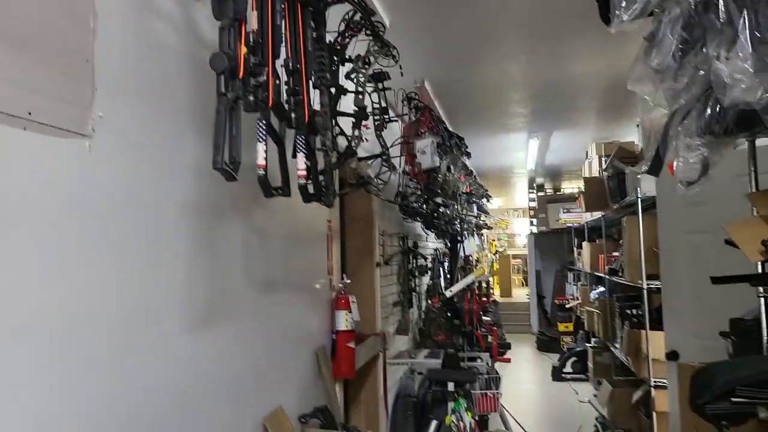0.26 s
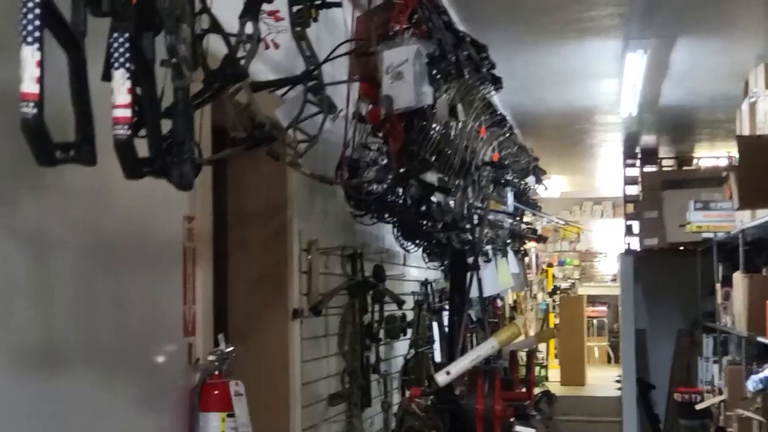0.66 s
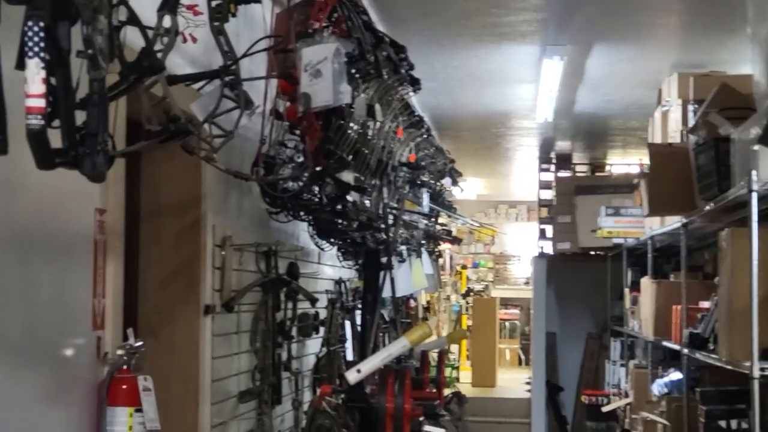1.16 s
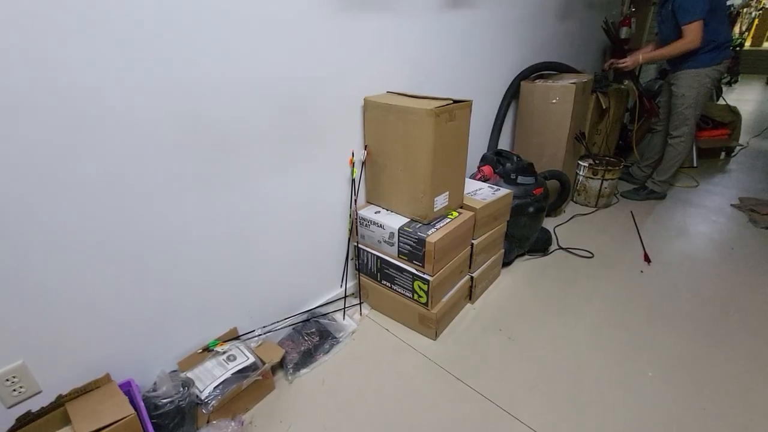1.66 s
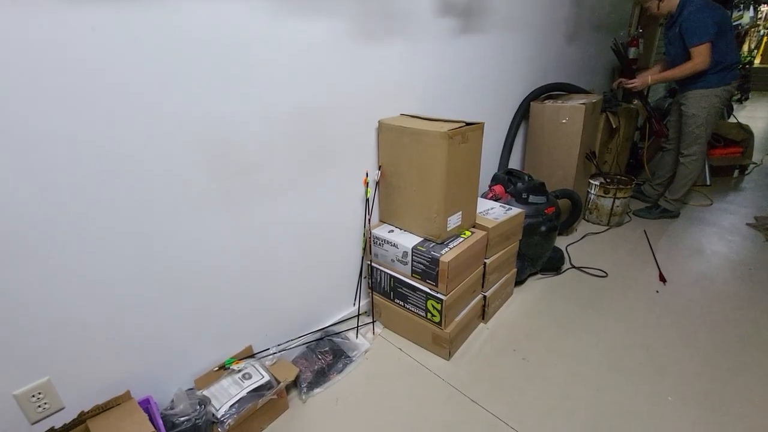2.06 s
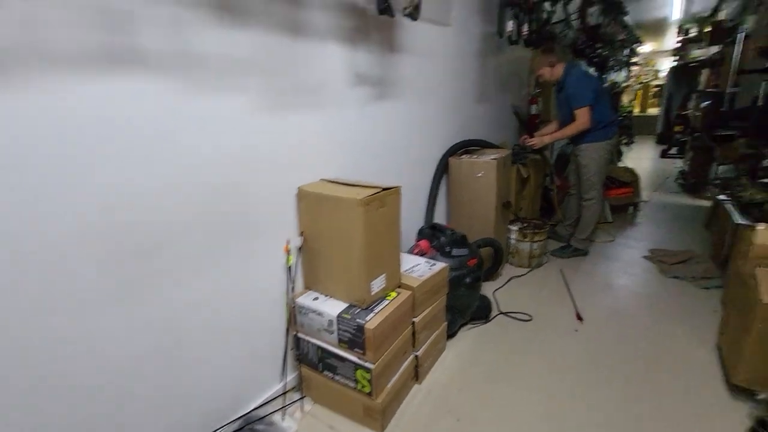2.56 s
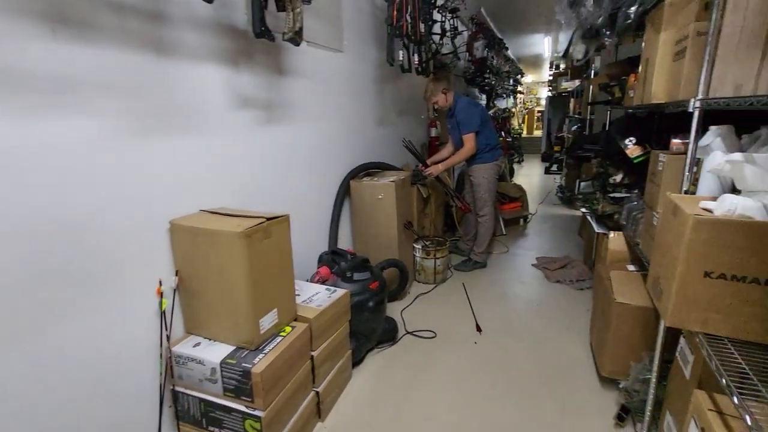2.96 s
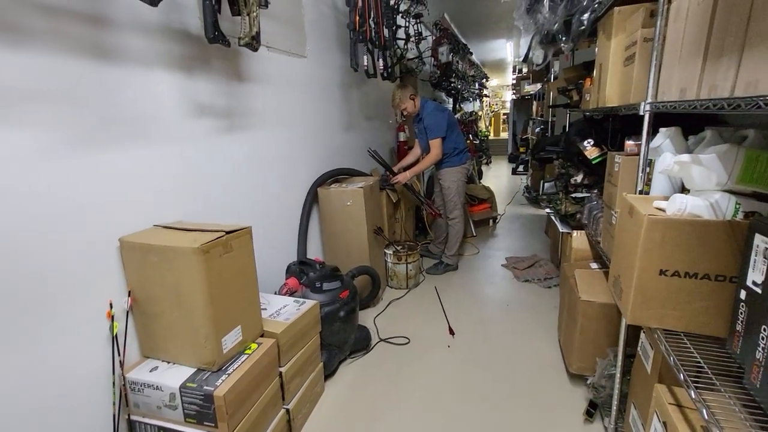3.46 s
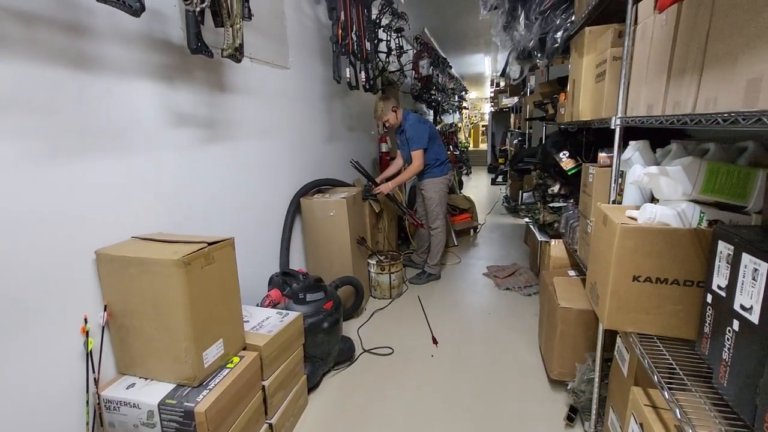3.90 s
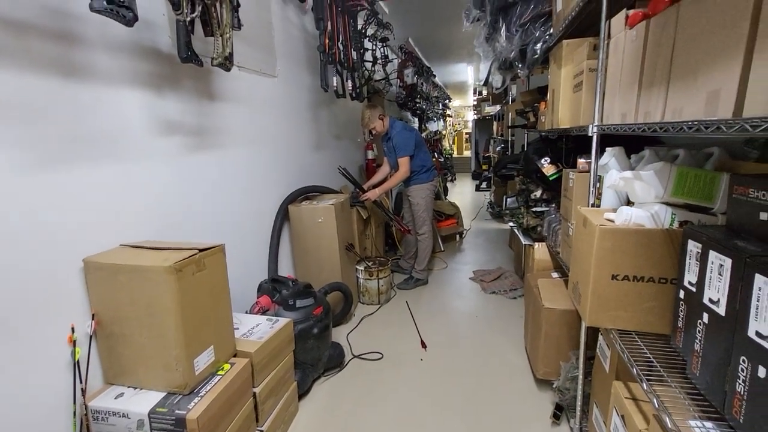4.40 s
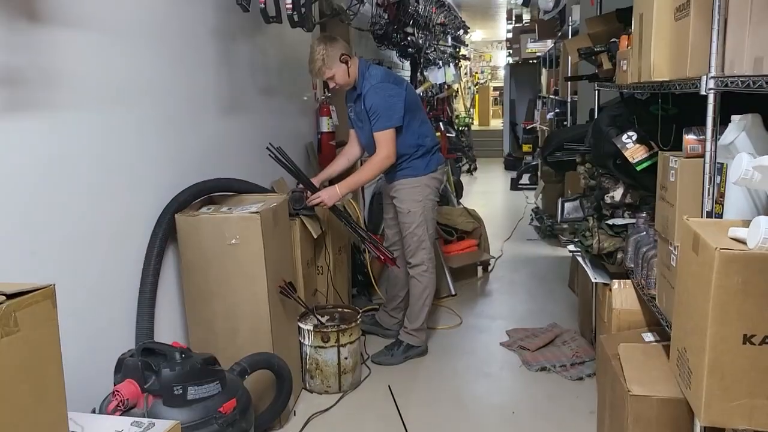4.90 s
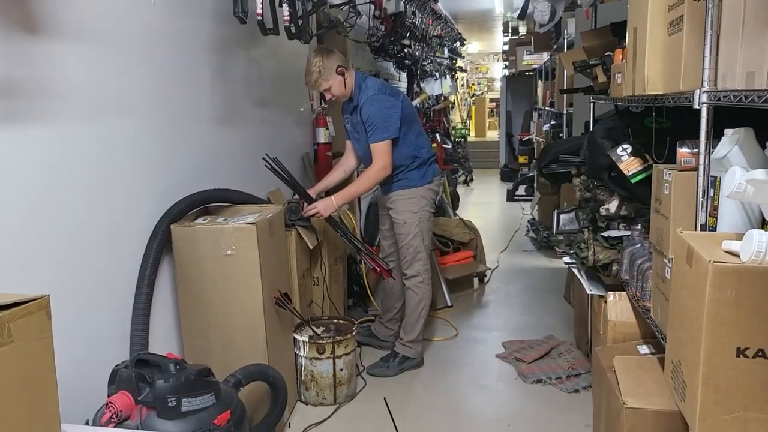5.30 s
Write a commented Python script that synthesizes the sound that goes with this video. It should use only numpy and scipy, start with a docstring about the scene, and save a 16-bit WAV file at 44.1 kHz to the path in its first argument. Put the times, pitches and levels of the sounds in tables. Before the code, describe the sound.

A quiet storeroom with faint low rumble, then a shop vacuum cuts in abruptly at full speed, rushing and humming steadily to the end.

```python
"""A shop vacuum at full speed, a few steps away, cuts in at once after a quiet storeroom.
Air, as noise shaped by resonances, rushes through its housing over sines: shaft hum and nine-blade whine.
A slower tone, likely a worn bearing's cage, drifts beside the hum; its harmonics, faint at first,
break into a thin squeal as the microphone is carried closer. The room before is rumble and soft noise."""
import sys
import numpy as np
from scipy import signal
from scipy.fft import rfft, irfft
from scipy.io import wavfile
from scipy.ndimage import uniform_filter1d

SR = 44100
rng = np.random.default_rng(int(sys.argv[2]) if len(sys.argv) > 2 else 0)


def output_pcm(signal):
    """Save a mono or channel-first signal as 16-bit PCM at the path in sys.argv[1].

    Samples are clipped to [-1, 1] before scaling.
    """
    pcm = np.clip(np.atleast_2d(signal).T, -1, 1) * 32767
    wavfile.write(sys.argv[1], SR, np.round(pcm).astype(np.int16))


N = 244402
TIME = np.arange(N) / SR
FFT_SIZE, HOP = 2048, 512
BINS = np.fft.rfftfreq(FFT_SIZE, 1 / SR)
FRAMES = np.arange(N // HOP + 5) * HOP / SR

HUSH_S, START_S = 1.579, 1.598  # the room stops; the vacuum enters
EMERGE_S, IN_VIEW_S, ARRIVE_S = 2, 2.7, 4.9  # from behind boxes, into open view, reached


def gain_of(db):
    """Decibels to amplitude."""
    return 10 ** (np.asarray(db) / 20)


def evened(x):
    """Scale to rms 1."""
    return x / np.sqrt(np.mean(x ** 2) + 1e-20)


def follow(rows, at=TIME):
    """Each column of a table, joined by straight lines."""
    first, *columns = np.transpose(rows)
    return [np.interp(at, first, column) for column in columns]


def read(rows):
    """Each column of a spectrum, joined on a log-frequency axis."""
    hz, *columns = np.transpose(rows)
    return [np.interp(np.log(BINS + 1), np.log(hz + 1), column) for column in columns]


def bell(x, centre, width):
    """Hump of height 1, half as high at half its width from the centre."""
    return 0.5 ** ((2 * (x - centre) / width) ** 2)


def ramp(at, start_s, end_s):
    """Even rise from 0 to 1 between two moments."""
    return np.clip((at - start_s) / (end_s - start_s), 0, 1)


def wander(rate_hz):
    """Smooth random signal of rms 1: noise under a Gaussian low-pass."""
    hz = np.fft.rfftfreq(N, 1 / SR)
    low_pass = np.exp(-(hz / rate_hz) ** 2) * (hz > 0)
    return evened(irfft(rfft(rng.standard_normal(N)) * low_pass, N))


def band(x, low_hz, high_hz):
    """The part of x between two frequencies."""
    hz = np.fft.rfftfreq(N, 1 / SR)
    return irfft(rfft(x) * ((hz >= low_hz) & (hz < high_hz)), N)


def noise_pair(field_db, same, phase=0, balance_db=0):
    """Noise at two microphones, shaped over time and frequency, partly alike in both."""
    a, b, c, d = rng.standard_normal((4, len(FRAMES), len(BINS)))
    same = np.clip(same, -1, 1)
    left = a + 1j * b
    right = same * np.exp(1j * phase) * left + np.sqrt(1 - same ** 2) * (c + 1j * d)
    tilt = gain_of(balance_db / 2)
    spectra = np.array([left * tilt, right / tilt]) * gain_of(field_db)
    _, pair = signal.istft(spectra, nperseg=FFT_SIZE, noverlap=FFT_SIZE - HOP, time_axis=1, freq_axis=2)
    return pair[:, :N]


def tone(turns, level_db, apart=0):
    """Sine at both ears at an rms level, the right ear behind by a phase in radians."""
    angle = 2 * np.pi * turns
    return np.sqrt(2) * gain_of(level_db) * np.sin([angle, angle - apart])


def walk(at=TIME):
    """How far the vacuum is in open view, and how much of the approach is done, both 0-1."""
    return ramp(at, EMERGE_S, IN_VIEW_S), ramp(at, START_S, ARRIVE_S)


def along_walk(ears):
    """Level of a motor tone at each ear as the microphone rounds the boxes and draws near."""
    view, near = walk()
    return np.array([db + view * view_db + near * near_db for db, view_db, near_db in ears])


def still_room(lumpy_db=0.5):
    """Uneven low rumble under a faint wash of air; both rise a little as the microphone moves."""
    # Each row: frequency in Hz, relative density in dB per Hz.
    room_spectrum = [(12, -42), (20, -8.5), (80, 8.5), (103, -10.5), (185, -17.5), (315, -17.5),
                     (352, -20.5), (439, -24), (549, -23.5), (985, -27), (2470, -27), (3000, -33.5),
                     (6360, -39), (8400, -61), (15500, -57)]
    # Each row: frequency in Hz, left-right likeness from -1 to 1.
    room_same = [(60, 0.88), (130, 0.93), (290, 0.88), (640, 0.46), (1410, 0.0049), (3100, -0.17),
                 (6820, 0.035), (15000, 0.02)]
    split_hz, rumble_db, air_db = 130, -52, -59  # levels of the ear average, before the rise
    noise = noise_pair(read(room_spectrum)[0], read(room_same)[0])
    low, high = band(noise, 0, split_hz), band(noise, split_hz, SR)
    rumble = low / np.std(low.mean(0)) * gain_of(rumble_db + lumpy_db * wander(8.3))
    air = high / np.std(high.mean(0)) * gain_of(air_db)
    rise_db = 3 * ramp(TIME, 0.22, 0.46)
    return (rumble + air) * gain_of(rise_db)


def standing_waves():
    """Fine peaks and dips of the room's response in dB, different at each ear, shifting over time."""
    ripple = rng.standard_normal((2, len(FRAMES), len(BINS)))
    ripple = uniform_filter1d(ripple, size=130, axis=1)
    ripple = evened(uniform_filter1d(ripple, size=2, axis=2))
    return 2.8 * ripple / np.sqrt(1 + (BINS / 9000) ** 2)  # the room soaks up the top treble


def rush(jet_from_hz=6500, jet_span_hz=8500, flutter_db=0.67):
    """Turbulent air coloured by resonances; the jet's treble grows on approach and eases at the end."""
    # Rushing air. Each row: frequency in Hz, relative density in dB per Hz.
    rush_spectrum = [(30, -70.5), (100, -62), (180, -58.5), (350, -54.5), (550, -53), (1000, -65.5),
                     (2700, -56), (4500, -58), (6300, -53), (7800, -66), (8350, -79), (9300, -68.5),
                     (12500, -62), (15500, -60)]
    # Low resonances of drum and hose, then those of housing and room.
    # Each row: centre in Hz, width in Hz, boost in dB behind the boxes, boost in dB in open view.
    drum = [(196.5, 36, 6.5, 4.5), (217.6, 22, -3, -7.5), (288, 23, -9, 4.5), (330, 30, 10.5, -1.5),
            (476, 83, 5, 3), (510, 42, -3, -4.5)]
    resonances = [(611, 45, 10.5, 1.5), (679, 110, 10, 13.5), (782.6, 59, 13, 14), (873, 65, 3, 7),
                  (1016, 250, 14.5, 12), (1290, 284, 13, 13.5), (1610, 217, 14, 9), (1826, 212, 13, 12.5),
                  (1972, 24, -6, 16), (2110, 62, 6.5, 9.5), (2270, 144, 4.5, 7.5), (2510, 200, 3, 5),
                  (3098, 163, 4.5, 8), (3493, 230, 5, 5), (3904, 480, 4, 6.5), (4316, 220, 5, 6.5),
                  (4670, 500, 5, 5.5), (6100, 160, 0.2, 3.5)]
    # Exhaust jet's top treble. Each row: time in seconds, boost in dB.
    jet = [(1.6, -3.5), (2.7, 0.5), (4.3, 3), (5.54, 1.5)]
    # Rush at the two ears. Each row: frequency in Hz, likeness 0-1, phase in radians,
    # left minus right in dB.
    ear_pair = [(60, .97, 0, 1), (330, .95, -.05, .5), (490, .7, -.2, 1.5), (570, .25, -1.4, 0),
                (720, .25, -3, 0), (1050, .7, -3.4, 2), (1290, .22, -3.6, 2), (1750, .7, -3, -2),
                (2130, .2, -3, -3), (2370, .35, -4.7, -2), (2740, .35, -2.6, -2.3), (3560, .34, -3, -1),
                (4340, .5, -4.6, -1.5), (4700, .22, -2.8, -1), (6150, .12, -3, -1.5), (15000, .1, -3, -1.2)]
    rush_db = -21  # 500-3900 Hz band of the ear average
    lag_s, wall_lag_s, lag_from_hz = 0.0009, 0.00127, 1700

    view = walk(FRAMES)[0][:, None]
    jet_db = follow(jet, FRAMES)[0][:, None]
    field_db = read(rush_spectrum)[0] + jet_db * np.clip((BINS - jet_from_hz) / jet_span_hz, 0, 1)
    for hz, width_hz, hidden_db, open_db in [*drum, *resonances]:
        field_db = field_db + (hidden_db + view * (open_db - hidden_db)) * bell(BINS, hz, width_hz)

    same, phase, balance_db = read(ear_pair)
    treble_hz = np.maximum(BINS - lag_from_hz, 0)
    # treble reaches the right side later; from behind the boxes it comes by way of the wall
    direct = np.exp(1j * (phase - 2 * np.pi * lag_s * treble_hz))
    by_wall = np.where(treble_hz > 0, np.exp(-2j * np.pi * wall_lag_s * treble_hz), direct)
    link = np.clip(same, 0, 1) * (view * direct + (1 - view) * by_wall)
    ripple_db = np.sqrt(np.maximum(1 - abs(link) ** 2, 0)) * standing_waves()
    air = noise_pair(field_db + ripple_db, abs(link), np.angle(link), balance_db)
    air = air / np.std(band(air.mean(0), 500, 3900))
    return air * gain_of(rush_db + flutter_db * wander(22))


def motor(jitter=0.00042):
    """Unbalanced shaft hums once a turn, blades whine at a multiple, iron hums at twice the mains rate."""
    # Shaft hum, left ear then right. Each row: level in dB behind the boxes,
    # dB added in open view, dB added on arrival.
    hum = [(-18, 1.4, -3), (-19, -1.5, -5.5)]
    # Each row: multiple of the shaft rate, level in dB, radians between the ears.
    overtones = [(2, -34.5, 2.16), (3, -33, 1.24), (14, -41, 1.0), (18, -49, 1.9)]
    shaft_hz, mains_hz, mains_db = 441.5, 60, -50.5
    turns = np.cumsum(shaft_hz * (1 + jitter * wander(4.25))) / SR
    out = tone(turns, along_walk(hum), apart=0.56)
    out += tone(2 * mains_hz * TIME, mains_db)
    for order, db, apart in overtones:
        out += tone(order * turns, db, apart)
    return out + whine(turns)


def whine(turns, fade_db=3.0, drift=0.6):
    """Blade-passing tone, flickering in the room's standing waves and swelling at each strong one."""
    # Left ear then right. Each row: level in dB behind the boxes, dB added in open view,
    # dB added on arrival.
    whine_levels = [(-27, -2.5, -6), (-29, 2, 0)]
    # Each row: peak in seconds, length in seconds, left level in dB, right level in dB,
    # radians between the ears.
    swells = [(1.7, .38, -19, -21.5, 3), (2.1, 0.27, -22.5, -32, 1.6), (2.679, 0.14, -23, -24, 4),
              (2.963, 0.19, -31, -19.5, 0), (3.532, 0.33, -24.5, -24.5, 2.3), (5.2, 0.86, -32, -26, -1.5)]
    blades, apart_rad = 9, 2.2
    passes = blades * turns
    fading_db = fade_db * np.array([wander(4), wander(3.6)])
    out = tone(passes, along_walk(whine_levels) + fading_db, apart_rad + drift * wander(4.0))
    for peak_s, length_s, left_db, right_db, apart in swells:
        share = bell(TIME, peak_s, length_s)
        out = out + share * (tone(passes, [[left_db], [right_db]], apart) - out)
    return out


def cage_rate():
    """Cage rate in Hz: creeps up to its free speed; once it chatters, friction drags it down as slowly."""
    start_hz, free_hz, drag_hz = 251.3, 259.9, 10.2
    drag_from_s, settle_s = 4.18, 0.77
    freed = 1 - np.exp(-np.maximum(TIME - START_S, 0) / settle_s)
    dragged = 1 - np.exp(-np.maximum(TIME - drag_from_s, 0) / settle_s)
    return start_hz + (free_hz - start_hz) * freed - drag_hz * dragged


def bearing(jitter=0.00021, throb_db=1.2, squeal_db=-1.5, fade_db=5.0, scatter=0.61):
    """Cage throbs at its own rate; chatter raises a stack of its harmonics, heard as a high squeal."""
    # Bursts of chatter. Each row: peak in seconds, length in seconds, relative level in dB.
    chatter = [(4.3, 0.28, 1.5), (4.703, 0.18, 2.5), (5.06, 0.33, -1), (5.41, 0.34, 1.5)]
    # Squeal on the cage rate. Each row: harmonic number, relative level in dB.
    squeal = [(2, -55), (7, -43), (14, -42), (22, -43), (26, -41), (28, -44), (33, -55), (38, -45),
              (45, -43), (52, -39), (55, -35), (57, -35), (59, -30), (62, -30)]
    # Narrow modes of the motor. Each row: centre in Hz, width in Hz, relative level in dB.
    squeal_modes = [(4789, 13, -28.5), (5062, 24, -28), (5102, 22, -31), (6095, 70, -30.5),
                    (6570, 50, -30.5), (6805, 40, -37), (14850, 70, -28.5), (15240, 90, -32)]
    cage_db, cage_view_db = -28, 1.2  # behind the boxes; added in open view
    idle_chatter_db = -29

    hz = cage_rate()
    bursts = sum(gain_of(db) * bell(TIME, peak_s, length_s) for peak_s, length_s, db in chatter)
    chatter_db = 20 * np.log10(gain_of(idle_chatter_db) + bursts)
    turns = np.cumsum(hz * (1 + jitter * wander(30))) / SR
    level_db = cage_db + cage_view_db * walk()[0] + throb_db * wander(9.6)
    out = tone(turns + 0.02 * wander(22), level_db, apart=0.17)

    orders = np.arange(2, 63)
    steps_s = np.linspace(0, TIME[-1], num=36)
    for order, db in zip(orders, follow(squeal, orders)[0]):
        for ear in out:  # reflections give each partial its own drifting phase and strength
            fade = np.interp(TIME, steps_s, rng.standard_normal(len(steps_s)))
            drift = np.interp(TIME, steps_s, rng.standard_normal(len(steps_s)))
            angle = 2 * np.pi * (order * turns + rng.random()) + scatter * drift
            partial_db = db + chatter_db + squeal_db + fade_db * fade
            ear += np.sqrt(2) * gain_of(partial_db) * np.sin(angle)

    for mode_hz, width_hz, db in squeal_modes:  # nearest partial rings out as it slides through
        order = np.round(mode_hz / hz)
        out += tone(order * turns, db + chatter_db, apart=0.8) * bell(order * hz, mode_hz, width_hz)
    return out


def scene(rise_s=0.0027):
    """The still room stops short; after a blink of silence the running vacuum comes in at once."""
    running = np.clip((TIME - START_S) / rise_s + 0.5, 0, 1)
    still = np.clip((HUSH_S - TIME) / rise_s + 0.5, 0, 1)
    return still * still_room() + running * (rush() + motor() + bearing())


def record(dry):
    """Peaks past the ceiling are shaved off; then a steep low-pass."""
    ceiling, edge_hz = 0.97, 15750
    held = np.clip(dry, -ceiling, ceiling)
    low_pass = signal.firwin(1023, edge_hz, window=("kaiser", 8), fs=SR)
    return signal.oaconvolve(held, low_pass[None], "same")


dry = scene()
out = record(dry)
output_pcm(out)
```